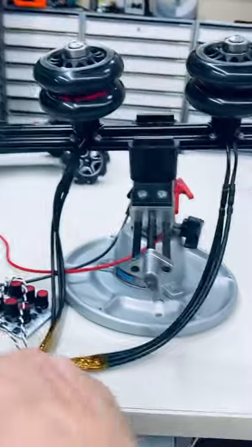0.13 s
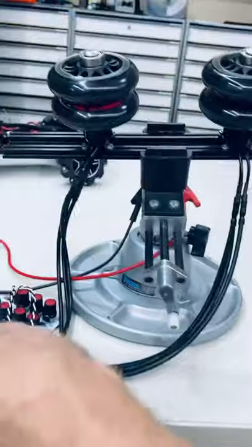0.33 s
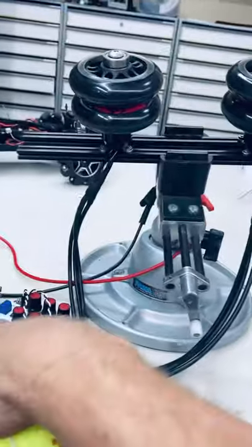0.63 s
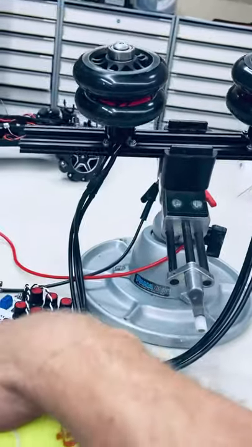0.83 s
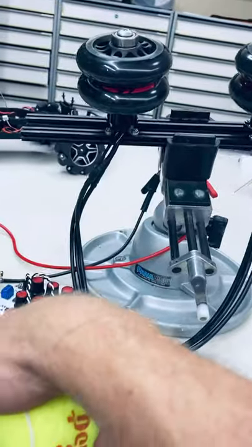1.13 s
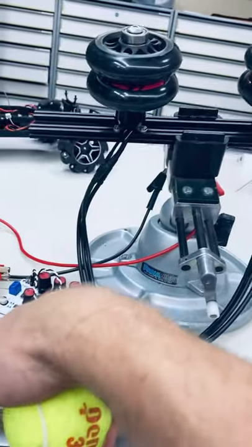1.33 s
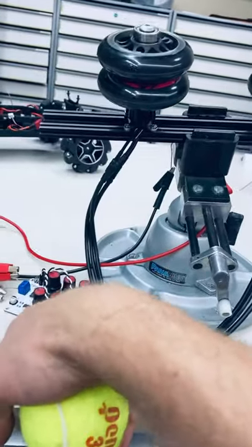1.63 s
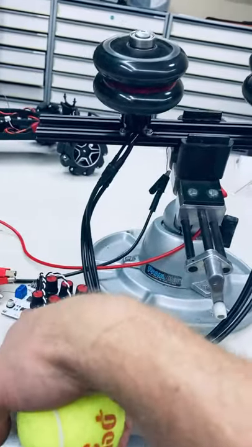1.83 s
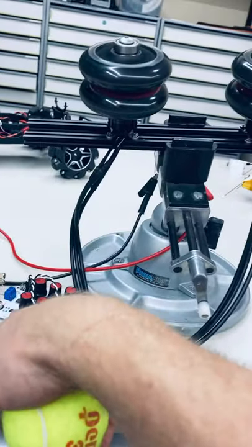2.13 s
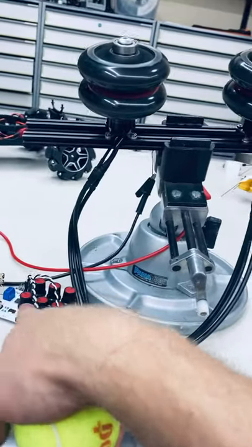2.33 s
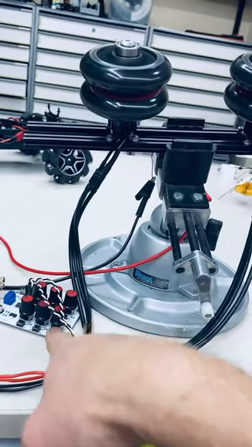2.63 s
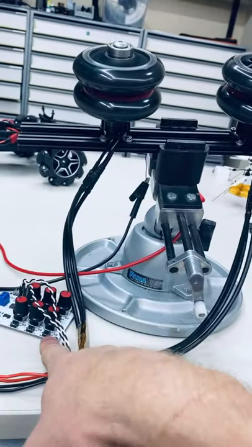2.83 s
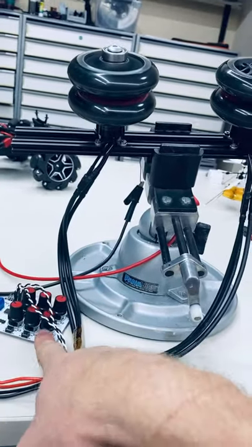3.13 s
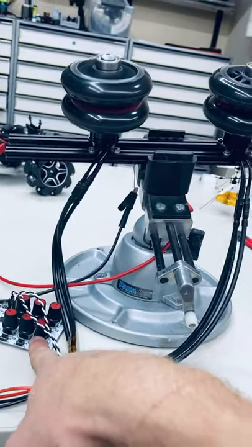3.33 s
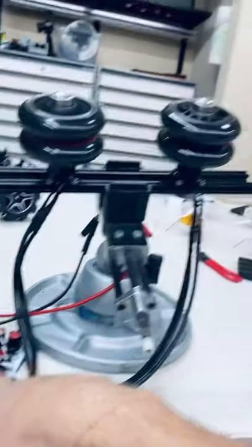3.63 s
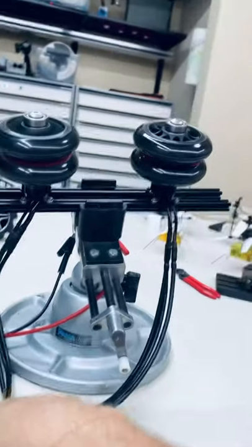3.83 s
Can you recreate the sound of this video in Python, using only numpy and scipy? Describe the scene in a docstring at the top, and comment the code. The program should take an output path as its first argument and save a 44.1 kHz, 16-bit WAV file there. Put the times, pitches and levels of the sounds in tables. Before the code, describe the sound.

A small electric motor spinning rubber wheels, close to the microphone in a workshop: soft finger taps, a switch click, a buzzing jerky start, then a fast rising whine that settles over bearing hiss.

```python
"""A brushless motor spins up a skate wheel on a workbench rig, close to the microphone. Sines tied to the shaft
speed sweep through the ring of the rotor bell and settle into a whine over bearing hiss. Before that come
finger taps and a switch click, made of short noise bursts, then the controller's wavering whistle and uneven
pulses that jerk the rotor and ring the casing. Late on, low noise puffs as the wheel's draught."""
import sys
import numpy as np
from scipy import signal
from scipy.fft import rfft, irfft, next_fast_len
from scipy.io import wavfile
from scipy.ndimage import uniform_filter1d, map_coordinates

SR = 44100
rng = np.random.default_rng(int(sys.argv[2]) if len(sys.argv) > 2 else 0)


def dump(signal):
    """Clip the signal to [-1, 1] and save it as 16-bit WAV at the path in sys.argv[1]."""
    limited = np.clip(np.atleast_2d(signal).T, -1, 1)
    pcm = np.round(limited * 32767).astype(np.int16)
    wavfile.write(sys.argv[1], SR, pcm)


N = 176400

# Steady room noise. Each row: frequency in Hz, relative level in dB.
FLOOR_COLOUR = [(25, -17), (70, -4), (125, -11.5), (180, -15.5), (280, -23.5), (400, -30.5), (620, -42.5),
                (1500, -51.5), (3700, -38), (15000, -59)]
FLOOR_DB, MAINS_HZ, MAINS_DB, MAINS_FLUTTER_DB = -71.5, 119, -63.5, .7
# Echo of the workshop. Each row: frequency in Hz, time to fall 60 dB in seconds.
ROOM_T60 = [(150, 0.3), (2000, 0.22), (12000, 0.035)]
# Likeness of the two channels. Each row: frequency in Hz, correlation from -1 to 1.
CHANNEL_LIKENESS = [(60, .99), (270, .98), (450, .13), (740, .3), (1220, -.15), (2010, .15), (3330, .08),
                    (5500, -.34), (7400, -.55), (8400, -.995), (10800, -.995), (11800, -.4), (15000, -.1)]

# Light finger taps. Each row: start in seconds, tap level in dB, ping level in dB, both before a trim.
TAPS = [(0.057, -52, -82), (0.107, -55, -82), (0.159, -53, -76), (0.263, -54.5, -68), (0.363, -62, -67),
        (0.465, -58, -80)]
# Colours of the tap's thud and its ping. Each row: frequency in Hz, relative level in dB.
TAP_COLOUR = [(100, -6), (250, 2.5), (380, 9.5), (600, -4), (1000, -19), (3000, -27), (4600, -33),
              (7000, -44), (15000, -56)]
PING_COLOUR = [(100, -40), (3500, -29), (4200, -11), (4500, 0), (4900, -14), (6500, -26), (15000, -45)]
# Switch clicks. Each row: start in seconds, dry peak in dB.
CLICKS = [(1.06, -56), (1.12, -42.5)]
# Colour of the switch. Each row: frequency in Hz, relative level in dB.
CLICK_COLOUR = [(120, 7.5), (200, 10), (400, -16), (650, -7), (850, 8.5), (1100, 4.5), (1700, -7.5),
                (2400, -13), (3600, -8.5), (5000, -19), (7500, -15.5), (10000, -27), (14000, -22.5)]
# Brushes of the hand. Each row: centre in seconds, bell-curve width in seconds, level in dB.
BRUSHES = [(.72, 0.022, -74), (.8, 0.016, -71), (1.16, 0.038, -67.5), (1.225, 0.011, -78),
           (1.335, 0.038, -65)]
# Colour of skin on the bench. Each row: frequency in Hz, relative level in dB.
BRUSH_COLOUR = [(100, 6.5), (500, -10), (1050, -3.5), (1600, -15.5), (2500, -23.5), (5000, -17.5),
                (9000, -20), (15000, -25)]

# Shaking of the rig. Each row: time in seconds, level in dB.
SHAKE_LEVEL = [(1.52, -77), (1.6, -50.5), (1.8, -46), (1.9, -63.5), (1.96, -33.5), (2.05, -34), (2.2, -41),
               (2.5, -55), (4, -78)]
# Colour of the shaking. Each row: frequency in Hz, relative level in dB.
RIG_COLOUR = [(30, -40.5), (80, -6), (115, 3), (250, -6.5), (350, -8), (460, -4.5), (650, -13),
              (1000, -14.5), (1500, -16), (2500, -28), (6000, -33)]
# The controller's switching whistle. Each row: time in seconds, pitch in Hz, level in dB.
WHISTLE = [(1.545, 15500, -80), (1.555, 15500, -41), (1.585, 15360, -31.5), (1.64, 15570, -40),
           (1.72, 15200, -37.5), (1.79, 15400, -33), (1.83, 15400, -44.5), (1.87, 15400, -65),
           (2, 15300, -104)]

# The sharp first kick. Each row: start in seconds, dry peak in dB.
FIRST_KICK = [(1.551, -26)]
# Strength of the commutation kicks. Each row: time in seconds, level in dB before a trim.
KICK_LEVEL = [(1.54, -41), (1.56, -36), (1.61, -30), (1.635, -26), (1.72, -26), (1.79, -30), (1.825, -23.5),
              (1.84, -18), (1.88, -24), (1.96, -21), (2.03, -29), (2.15, -30), (2.5, -33.5), (4, -30.5)]
# The motor's answer to a kick. Each row: frequency in Hz, relative level in dB.
CASING_COLOUR = [(60, -42.5), (300, -28), (415, -11), (520, -26), (900, -18.5), (1400, -37), (2150, -35),
                 (2550, -26), (2950, -12), (3350, -17.5), (3900, -7), (4450, -8.5), (5100, -0.5),
                 (5900, -2.5), (6600, -9), (7600, -9.5), (9800, -54), (11000, -39), (11600, -9.5),
                 (12400, -26.5), (13500, -22.5), (15000, -23.5)]
# Modes of the casing. Each row: frequency in Hz, width in Hz, relative level in dB.
CASING_MODES = [(3065, 24, -20.5), (3190, 14, -10), (3760, 13, -7), (4430, 37, -8), (4590, 50, 4),
                (5190, 62, 10), (5700, 34, -5), (5640, 14, -2), (6600, 47, -8.5)]
# Growl of the stalled rotor. Each row: time in seconds, level in dB.
GROWL_LEVEL = [(1.55, -68), (1.6, -54.5), (1.66, -47), (1.7, -53), (1.735, -33.5), (1.79, -58.5),
               (1.84, -41), (1.9, -88)]
KICK_HZ, KICK_SCATTER_DB, GROWL_HZ = 419, 0.5, 414  # the kick rate strays around its value
RATTLE_S, CASING_RING_DB = .0012, -6  # decay constant; ring level at standstill against the knocks

# Shaft speed. Each row: time in seconds, turns per second.
SHAFT_SPEED = [(1.8, 6), (1.83, 22.6), (1.85, 38.8), (1.9, 72.4), (1.95, 96), (2, 114.6), (2.05, 129.6),
               (2.1, 141.6), (2.2, 160), (2.3, 172.8), (2.4, 181.8), (2.5, 188.7), (2.7, 197.6),
               (2.85, 201.3), (3, 203.8), (3.3, 206.5), (3.6, 207.6), (4, 208.3)]
TOP_SPEED = 208  # turns per second
# Motor current. Each row: time in seconds, relative level in dB.
CURRENT = [(1.8, -26), (1.84, -3), (1.87, 0), (1.96, 0), (2.03, -1), (2.12, -12), (2.2, -6), (2.27, -12),
           (2.4, -17), (2.7, -14), (2.95, -15), (3.1, -29), (4, -29)]
# Low harmonics of the 14 magnets and a sideband. Each entry: multiple of the shaft speed.
MAGNET_ORDERS = [13, 14, 42]
# Their levels. Each entry: dB before current and response.
MAGNET_DB = [-33.5, -36, -26.5]
# How well the stator radiates them. Each row: frequency in Hz, response in dB.
STATOR_RESPONSE = [(200, -25), (430, -1), (640, -2), (850, -2), (1050, -24), (1600, -18), (2400, -24),
                   (2750, -16), (3020, 0), (3400, -4), (3950, 1), (4450, -6), (4820, 3), (5250, -7),
                   (5650, -1), (6000, -7), (6600, 0), (7000, -10), (8000, -20), (8500, -40)]
# Higher magnet harmonics. Each entry: multiple of the shaft speed.
HIGH_ORDERS = [56, 70, 84, 98, 112, 140]
# Their levels. Each entry: dB before current and response.
HIGH_DB = [-20.5, -21.5, -32, -23.5, -35, -27]
# How well the rotor bell radiates them. Each row: frequency in Hz, response in dB.
BELL_RESPONSE = [(1000, -45), (3500, -26), (4600, -16), (4950, -3), (5150, 1), (5600, -1), (5900, -7.5),
                 (7000, -9.5), (7900, -16), (8500, -46), (10500, -42), (11200, -11), (11450, -17),
                 (12300, -13), (13000, -28), (15000, -36)]
# Phase between the channels. Each row: frequency in Hz, left lead in radians.
LEFT_LEAD = [(100, 0), (450, -.3), (900, -2), (2500, 0), (4000, 2.2), (5300, 1.9), (7400, 2.6),
             (8200, 3.14), (11000, 3.14), (11800, 2.2), (15000, 2)]
MAGNET_FLUTTER_DB, MAGNET_FLUTTER_RATE, MAGNET_DRIFT = 1.7, 110, .3  # dB, knots a second, radians
WHINE_WET_DB, WHEEL_WET_DB = -11, -16

# Lines of the rotor bell. Each entry: multiple of the shaft speed.
BELL_ORDERS = [28, 32, 35]
# One row per line: base level in dB, resonance in Hz, width in Hz, flare in dB, left lead in radians.
BELL_LINES = [(-43, 5040, 250, 19, 2.3), (-57, 5660, 200, 28, 1.7), (-59, 5610, 280, 23, 1.5)]
BELL_FLUTTER_DB = 2.2

# Tones of the spinning wheel and rotor. Each entry: multiple of the shaft speed.
WHEEL_ORDERS = [12, 13, 14, 15]
# One row per tone: level in dB before the resonance, left lead in radians.
WHEEL_TONES = [(-50, .5), (-36.5, .2), (-39.5, 1.7), (-46, 1.2)]
# The wheel's resonance. Each row: frequency in Hz, response in dB.
WHEEL_RESPONSE = [(1000, -24), (1600, -11), (2000, -12), (2250, -10), (2430, -1), (2680, 1), (2900, -1.5),
                  (3000, -5), (3100, -12)]
# Unbalance hum, one cycle a turn. Each row: time in seconds, level in dB before the lurch.
UNBALANCE_LEVEL = [(1.88, -71), (1.97, -51), (2.07, -38.5), (2.14, -36.5), (2.3, -39), (2.7, -43),
                   (3.25, -41), (3.5, -34), (4, -33.5)]
LURCH_DB, LURCH_LIMIT, LURCH_RATE = 7, .15, 22  # depth, cap on the speed shortfall, knots a second
WHEEL_FLUTTER_DB, WHEEL_DRIFT = 1.6, .3  # dB, radians

# Low shaft harmonics that shake the frame. Each entry: multiple of the shaft speed.
FRAME_ORDERS = [2, 3, 4]
# Their levels. Each entry: dB before the frame's response.
FRAME_DB = [-41, -41, -44]
# Response of the frame. Each row: frequency in Hz, response in dB.
FRAME_RESPONSE = [(100, -25), (260, -11), (335, 0), (372, -12), (403, 0), (418, -11), (450, 1), (490, -8),
                  (528, -1), (555, -15), (600, -20), (680, -11), (900, -17)]
# Frame modes set ringing by the run-up.
# Each row: centre in seconds, bell-curve width in seconds, level in dB, pitch in Hz.
FRAME_RINGS = [(1.962, 0.031, -39, 79), (1.99, 0.016, -35.5, 440), (2.036, 0.032, -30, 111.1),
               (2.05, 0.035, -40, 515.4)]
FRAME_ONSET_SPEED = 146  # turns per second

# Hiss of bearings and air. Each row: frequency in Hz, relative level in dB.
HISS_COLOUR = [(30, -24.5), (120, -9), (300, -2.5), (520, -8.5), (800, -3.5), (1300, 0), (1800, 0.5),
               (2250, -5), (3000, 1), (3600, -5), (4300, -1), (5000, -14.5), (5800, 0), (6400, -5.5),
               (7400, -0.5), (8200, -37.5), (10000, -64), (12500, -17.5), (14000, -12), (15600, -17)]
# Stereo lean of the hiss. Each row: frequency in Hz, left minus right in dB.
HISS_LEAN = [(60, -9), (110, 1.5), (200, 2), (380, 0), (700, -11.5), (1290, -1), (2380, -0.5), (4400, 0),
             (8120, 1), (15000, 0)]
HISS_DB, HISS_DB_PER_DECADE, HISS_PULSING = -29.5, 59.5, 0.051  # at top speed; per tenfold speed; depth

# Puffs of draught. Each row: centre in seconds, bell-curve width in seconds, level in dB.
PUFFS = [(2.67, 0.091, -53.5), (3.02, 0.022, -33.5), (3.22, 0.033, -32), (3.33, 0.013, -32),
         (3.57, 0.075, -50), (3.85, 0.024, -45), (3.94, 0.028, -36.5)]
# Colour of the draught. Each row: frequency in Hz, relative level in dB.
DRAUGHT_COLOUR = [(20, -27.5), (50, -0.5), (100, 1), (160, -12.5), (300, -16), (1000, -71.5)]
TOP_HZ = 15900


def amp(db):
    """Decibels to gain."""
    return 10 ** (np.asarray(db) / 20)


def unit(x):
    """Scale to rms 1."""
    return x / np.sqrt(np.mean(x ** 2) + 1e-20)


def along(points, hz):
    """Read a (Hz, value) curve on a log frequency axis."""
    f, v = np.transpose(points)
    return np.interp(np.log(hz + 1), np.log(f + 1), v)


def clock():
    """Time of each sample in seconds."""
    return np.arange(N) / SR


def curves(rows):
    """One value per sample for each column after the time."""
    s, *cols = np.transpose(rows)
    return [np.interp(clock(), s, c) for c in cols]


def wobble(rate):
    """A smooth random curve, rate knots a second."""
    return map_coordinates(rng.standard_normal(8192), [clock() * rate], mode="wrap")


def swells(rows):
    """Bell-shaped swells from (centre, width, dB) rows."""
    return sum(amp(db) * np.exp(-.5 * ((clock() - s) / width) ** 2) for s, width, db in rows)


def filtered(x, response):
    """Multiply the spectrum by a complex response of frequency."""
    m = next_fast_len(N + SR // 2)
    return irfft(rfft(x, m) * response(np.fft.rfftfreq(m, 1 / SR)), m)[..., :N]


def spread(pair):
    """Mix two unrelated signals into a stereo pair: alike in the bass, opposed in parts of the treble."""
    def mid_and_side(hz):
        turn = np.arccos(np.clip(along(CHANNEL_LIKENESS, hz), -1, 1)) / 2
        return np.array([np.cos(turn), np.sin(turn)])

    mid, side = filtered(pair, mid_and_side)
    return np.array([mid + side, mid - side])


def noise(colour):
    """Coloured stereo noise of rms 1."""
    white = rng.standard_normal((2, N))
    return unit(spread(filtered(white, lambda hz: amp(along(colour, hz)))))


def ring(colour, size=4096):
    """Minimum-phase impulse response with this colour, by folding its cepstrum."""
    cepstrum = irfft(np.log(amp(along(colour, np.fft.rfftfreq(size, 1 / SR)))))
    cepstrum[1:size // 2] *= 2
    cepstrum[size // 2 + 1:] = 0
    return irfft(np.exp(rfft(cepstrum)))


def tone(phase, lead, flutter_db, flutter_rate, drift):
    """A stereo sine, rms 1 before flutter, whose level and phase waver partly apart in each ear."""
    shared = wobble(flutter_rate)
    ears = []
    for side in (.5, -.5):
        level = amp(flutter_db * (shared + wobble(flutter_rate)))
        ears.append(level * np.sin(phase + side * lead + drift * wobble(flutter_rate)))
    return np.sqrt(2) * np.array(ears)


def room(x, wet_db):
    """Add the workshop's short echo: noise that dies away faster in the treble."""
    hz, t, z = signal.stft(rng.standard_normal((2, SR // 2)), SR, nperseg=256)
    decay = amp(-60 * t / along(ROOM_T60, hz)[:, None])
    tail = signal.istft(z * decay, SR, nperseg=256)[1]
    tail = tail / np.linalg.norm(tail[0])
    echo = signal.fftconvolve(np.atleast_2d(x), tail, axes=1)[:, :N]
    return x + amp(wet_db) * spread(echo)


def contacts(rows, colour, decay_s, gain_db, wet_db):
    """Small contacts: a brief decaying noise burst rings the touched part."""
    out, t = np.zeros(N + SR), np.arange(SR // 10) / SR
    for s, db in rows:
        burst = rng.standard_normal(len(t)) * np.exp(-t / decay_s)
        hit = signal.fftconvolve(burst, ring(colour))
        out[int(s * SR):][:len(hit)] += amp(db + gain_db) * hit / np.abs(hit).max()
    return room(out[:N], wet_db)


def background():
    """Steady coloured room noise and one wavering tone of mains hum."""
    hum = tone(2 * np.pi * MAINS_HZ * clock(), 0, MAINS_FLUTTER_DB, flutter_rate=12.0, drift=.05)
    return amp(FLOOR_DB) * noise(FLOOR_COLOUR) + amp(MAINS_DB) * hum


def hand():
    """Taps with a small metallic ping, the switch, and skin brushing the bench as swelling noise."""
    tap_rows = [(s, db) for s, db, _ in TAPS]
    ping_rows = [(s, db) for s, _, db in TAPS]
    taps = contacts(tap_rows, TAP_COLOUR, decay_s=0.0045, gain_db=-2.5, wet_db=-3.5)
    pings = contacts(ping_rows, PING_COLOUR, decay_s=0.0035, gain_db=-4.5, wet_db=-1)
    clicks = contacts(CLICKS, CLICK_COLOUR, decay_s=0.0062, gain_db=0, wet_db=2.5)
    return taps + pings + clicks + swells(BRUSHES) * noise(BRUSH_COLOUR)


def rig_shake():
    """The rig shakes broadly, as coloured noise that swells around the run-up."""
    return amp(curves(SHAKE_LEVEL)[0]) * noise(RIG_COLOUR)


def whistle():
    """The controller's high switching tone: its pitch glides and its phase wavers fast, so it sounds smeared."""
    hz, db = curves(WHISTLE)
    phase = 2 * np.pi * np.cumsum(hz) / SR + .35 * wobble(260)
    whistling = tone(phase, 0, flutter_db=2.5, flutter_rate=30, drift=0.12)
    return amp(db + 2.1 * wobble(200)) * whistling * (clock() > WHISTLE[0][0])


def kicks():
    """After one sharp first kick, uneven current pulses knock the casing and ring its modes; the rotor growls."""
    started = clock() > FIRST_KICK[0][0]
    count = np.floor(np.cumsum(KICK_HZ * np.exp(.5 * wobble(300))) / SR)
    scatter = amp(KICK_SCATTER_DB * np.clip(rng.standard_normal(N), -2, 2))
    pulses = np.diff(count, prepend=0) * scatter * started

    t = np.arange(SR // 8) / SR
    rattle = signal.fftconvolve(pulses, np.exp(-t / RATTLE_S))[:N] * rng.standard_normal(N)
    knocks = unit(signal.fftconvolve(rattle, ring(CASING_COLOUR))[:N])

    modes = sum(amp(db) * np.exp(-np.pi * width * t) * width * np.sin(2 * np.pi * hz * t)
                for hz, width, db in CASING_MODES)
    casing_ring = unit(signal.fftconvolve(pulses, modes)[:N])
    # the ring fades as the rotor gains speed
    stalled = np.clip(1 - curves(SHAFT_SPEED)[0] / TOP_SPEED, 0, 1)
    knocks = knocks + amp(CASING_RING_DB) * stalled * casing_ring
    pair = filtered(knocks, lambda hz: np.exp(.5j * np.outer([1, -1], along(LEFT_LEAD, hz))))

    growl = tone(2 * np.pi * GROWL_HZ * clock(), 0, flutter_db=3, flutter_rate=33, drift=.25)
    growl = amp(curves(GROWL_LEVEL)[0]) * growl * started
    first = contacts(FIRST_KICK, CASING_COLOUR, decay_s=0.001, gain_db=0, wet_db=-16)
    return room(pair * amp(curves(KICK_LEVEL)[0] - 5.0), wet_db=-4.5) + growl + first


def magnet_whine(speed, angle):
    """Magnet harmonics follow the current; the stator radiates the low ones, the bell flares the high ones."""
    current_db, = curves(CURRENT)
    groups = ((MAGNET_ORDERS, MAGNET_DB, STATOR_RESPONSE), (HIGH_ORDERS, HIGH_DB, BELL_RESPONSE))
    out = 0
    for orders, levels, response in groups:
        for k, db in zip(orders, levels):
            hz = k * speed
            level = amp(db + current_db + along(response, hz))
            out = out + level * tone(k * angle, along(LEFT_LEAD, hz), MAGNET_FLUTTER_DB,
                                     MAGNET_FLUTTER_RATE, MAGNET_DRIFT)
    return room(out * (speed > 0), WHINE_WET_DB)


def rotor_bell(speed, angle):
    """Three lines of the spinning bell, each flaring as it crosses a resonance."""
    out = 0
    for k, (db, centre_hz, width_hz, flare_db, lead) in zip(BELL_ORDERS, BELL_LINES):
        hz = k * speed
        flare = 1 + amp(flare_db) / (1 + (2 * (hz - centre_hz) / width_hz) ** 2)
        level = amp(db) * flare * np.clip(hz / centre_hz, 0, 1) ** 4
        out = out + level * tone(k * angle, lead, BELL_FLUTTER_DB, flutter_rate=30, drift=0.069)
    return room(out, WHINE_WET_DB)


def wheel_whine(speed, angle):
    """Rotor tones climb into the wheel's resonance; the unbalance hum lurches until the speed settles."""
    turning = np.clip(speed / 100, 0, 1) ** 2
    out = 0
    for k, (db, lead) in zip(WHEEL_ORDERS, WHEEL_TONES):
        level = amp(db + along(WHEEL_RESPONSE, k * speed))
        out = out + level * tone(k * angle, lead, WHEEL_FLUTTER_DB, flutter_rate=13, drift=WHEEL_DRIFT)
    shortfall = np.clip(1 - speed / TOP_SPEED, 0, LURCH_LIMIT)
    lurch_db = LURCH_DB * np.sqrt(shortfall) * wobble(LURCH_RATE)
    hum = tone(angle, 0, flutter_db=.5, flutter_rate=22, drift=0.059)
    hum = amp(curves(UNBALANCE_LEVEL)[0] + lurch_db) * hum
    return room(out * turning, WHEEL_WET_DB) + hum * (speed > 0)


def frame_hum(speed, angle):
    """Low shaft harmonics swell as they pass the frame's resonances; its modes ring at their own pitch."""
    out = 0
    for k, db in zip(FRAME_ORDERS, FRAME_DB):
        level = amp(db + along(FRAME_RESPONSE, k * speed))
        out = out + level * tone(k * angle, 0, flutter_db=2.5, flutter_rate=24, drift=0.95)
    rings = 0
    for s, width, db, hz in FRAME_RINGS:
        mode = tone(2 * np.pi * hz * clock(), 0, flutter_db=-0.6, flutter_rate=29, drift=0.055)
        rings = rings + swells([(s, width, db)]) * mode
    return out * np.clip(speed / FRAME_ONSET_SPEED, 0, 1) ** 4 + rings


def hiss(speed, angle):
    """Bearing and air noise grows with speed and pulses once a turn."""
    speed_db = HISS_DB_PER_DECADE * np.log10(speed / TOP_SPEED + 1e-6)
    level = amp(HISS_DB + speed_db + 1.13 * wobble(15))
    air = filtered(noise(HISS_COLOUR), lambda hz: amp(np.outer([.5, -.5], along(HISS_LEAN, hz))))
    return air * level * (1 + HISS_PULSING * np.cos(angle))


def draught():
    """The wheel's draught puffs at the microphone: swells of low noise."""
    return swells(PUFFS) * noise(DRAUGHT_COLOUR)


def scene():
    """The shaft speed drives the motor's whines, hum and hiss; the other layers keep their own timing."""
    # smooth the corners of the speed curve
    speed = uniform_filter1d(curves(SHAFT_SPEED)[0], size=1300) * (clock() > SHAFT_SPEED[0][0])
    angle = 2 * np.pi * np.cumsum(speed) / SR
    start = whistle() + kicks()
    whine = magnet_whine(speed, angle) + rotor_bell(speed, angle) + wheel_whine(speed, angle)
    running = whine + frame_hum(speed, angle) + hiss(speed, angle)
    return background() + hand() + rig_shake() + start + running + draught()


def record(dry):
    """Cut everything at and above the band limit."""
    return filtered(dry, lambda hz: hz < TOP_HZ)


dry = scene()
out = record(dry)
dump(out)
```